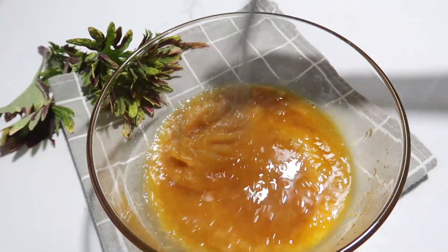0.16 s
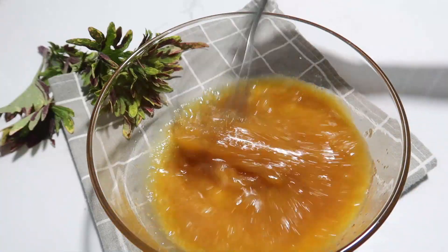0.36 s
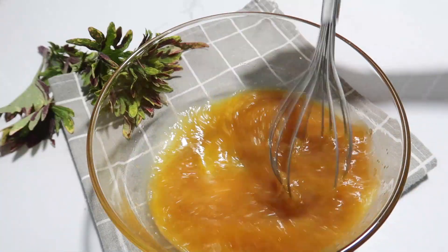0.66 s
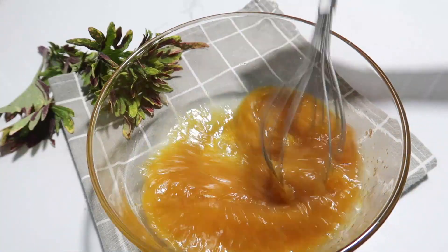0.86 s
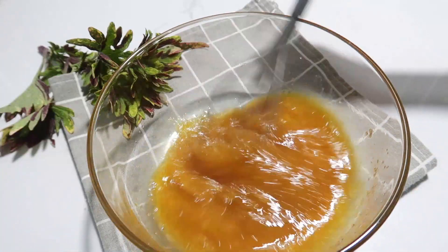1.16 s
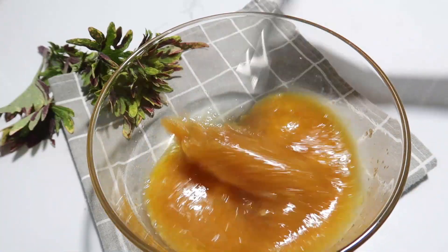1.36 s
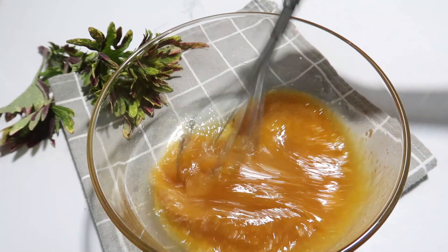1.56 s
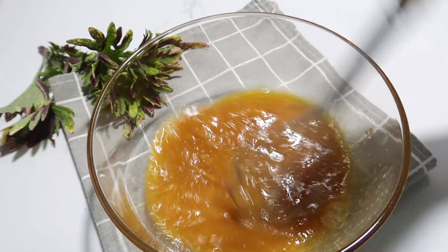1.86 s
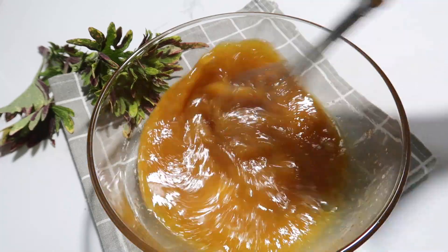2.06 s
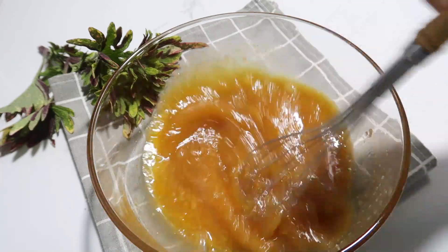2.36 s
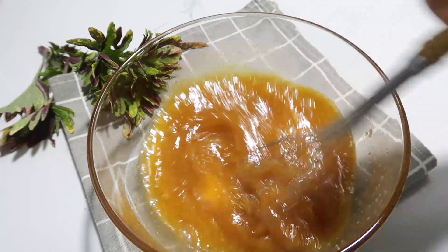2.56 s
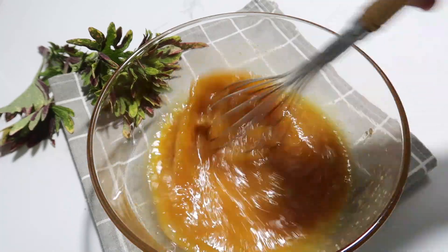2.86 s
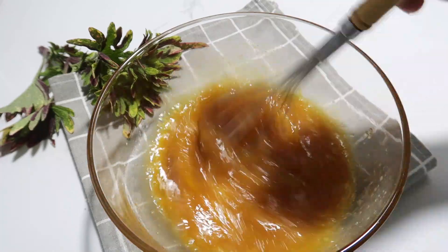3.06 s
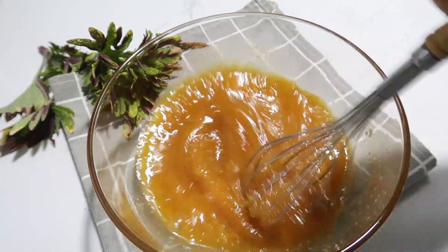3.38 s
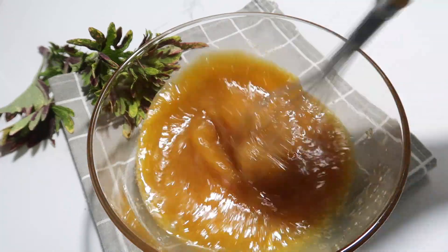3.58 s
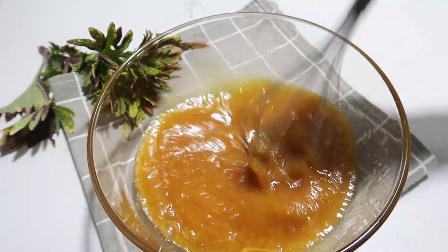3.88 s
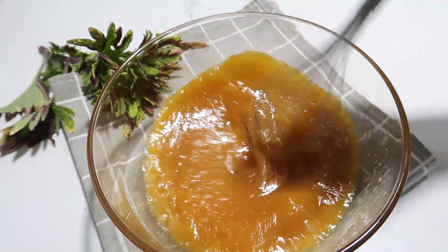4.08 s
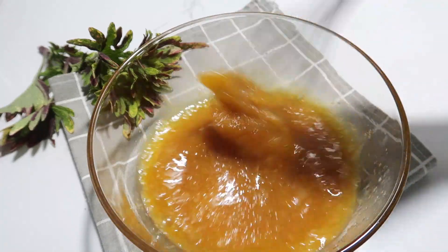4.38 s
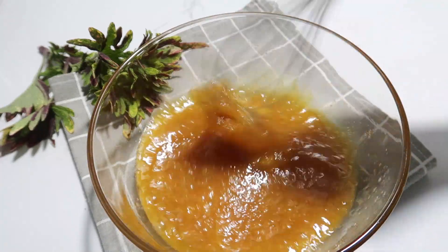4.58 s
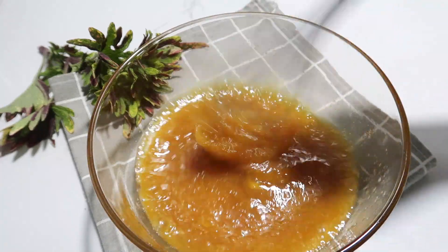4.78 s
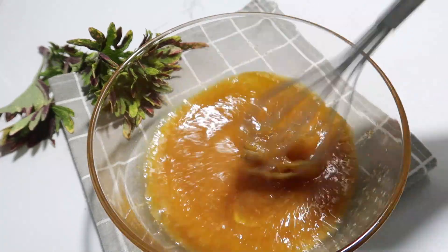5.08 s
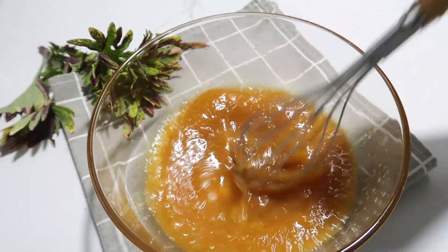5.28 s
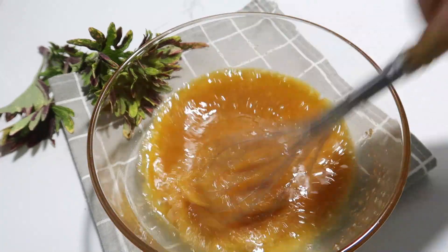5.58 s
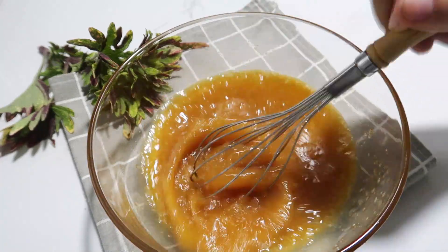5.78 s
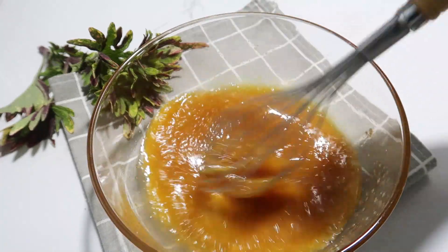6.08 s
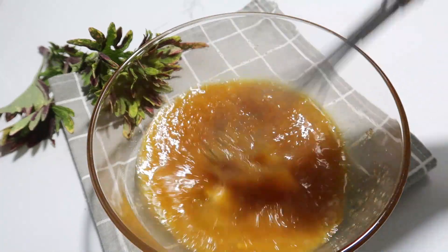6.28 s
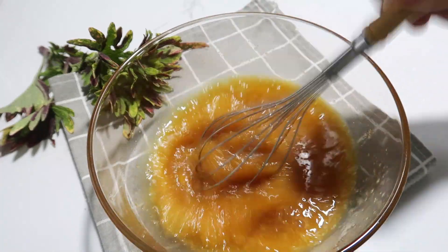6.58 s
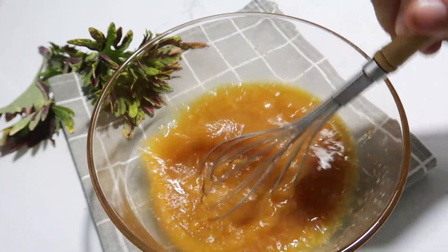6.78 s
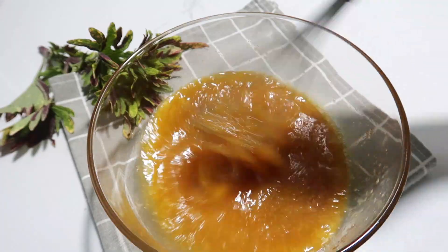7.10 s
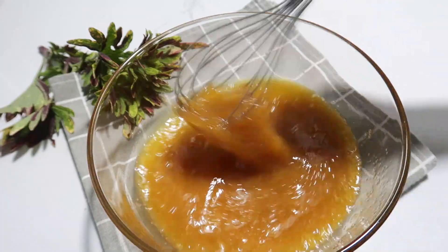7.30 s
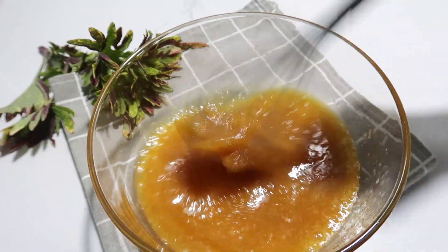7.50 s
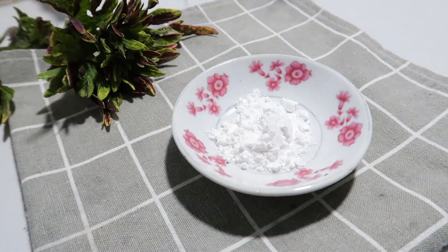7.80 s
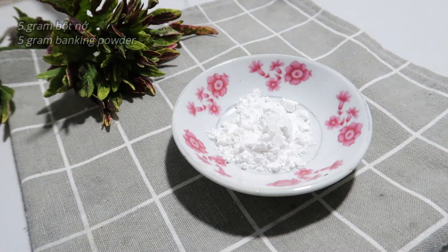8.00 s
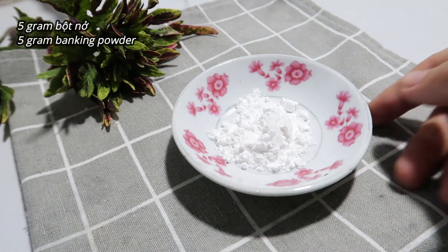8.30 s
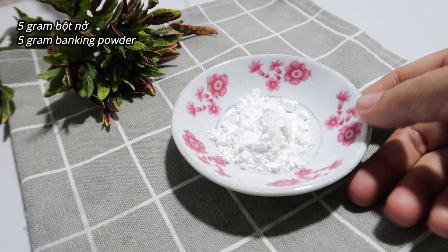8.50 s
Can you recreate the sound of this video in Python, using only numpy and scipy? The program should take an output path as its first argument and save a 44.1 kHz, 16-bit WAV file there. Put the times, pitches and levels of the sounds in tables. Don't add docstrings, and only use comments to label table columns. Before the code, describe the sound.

A wire whisk beats thick egg in a glass bowl, brisk scraping clinks about five a second, then quiet room hush.

```python
import sys
import numpy as np
from scipy import signal
from scipy.io import wavfile
from scipy.ndimage import uniform_filter1d

SR = 44100
rng = np.random.default_rng(int(sys.argv[2]) if len(sys.argv) > 2 else 0)


def int16_out(signal):
    q = np.round(np.clip(np.atleast_2d(signal).T, -1, 1) * 32767)
    wavfile.write(sys.argv[1], SR, q.astype(np.int16))


def level_to_linear(level):
    exponent = np.asarray(level, float) / 20
    return 10 ** exponent


N = 381465


def evened(x):
    return x / np.sqrt(np.mean(x ** 2) + 1e-20)


def read(points, hz):
    f, value = np.transpose(points)
    return np.interp(np.log(hz + 1), np.log(f + 1), value)


def curve(rows):
    return level_to_linear(np.interp(np.arange(N) / SR, *np.transpose(rows)))


def add(mix, s, sound):
    part = mix[round(s * SR):][:len(sound)]
    part += sound[:len(part)]


def above(x, edge_hz):
    return signal.sosfilt(signal.butter(5, edge_hz, "high", fs=SR, output="sos"), x)


def body(modes, spread_db, detune, size=1500):
    hz, width, db = np.transpose(modes)[:, :, None]
    luck_hz, luck_db = rng.standard_normal((2, len(modes), 1))
    t = np.arange(size) / SR
    decay = np.sqrt(width) * np.exp(-np.pi * width * t)
    rings = decay * np.sin(2 * np.pi * hz * (1 + detune * luck_hz) * t)
    response = (level_to_linear(db + spread_db * luck_db) * rings).sum(0)
    return response / np.linalg.norm(response)


# (time [s], thump level [dB], glass level [dB], wire fizz level [dB])
STROKES = [(.575, -21.5, -21, -24), (.603, -51, -36, -64.5), (0.716, -28, -6, -25.5),
           (0.774, -47, -25, -28.5), (.977, -22.5, -18, -17.5), (1.176, -16.5, -12, -20.5),
           (1.378, -30.5, -19.5, -25.5), (1.585, -29.5, -19.5, -17.5), (1.912, -43, -26.5, -60.5),
           (2.344, -53, -29, -33.5), (3.988, -52, -37.5, -32), (4.009, -36.5, -22, -33.5),
           (4.229, -28.5, -20.5, -22.5), (4.428, -25, -14, -21.5), (4.454, -42, -30.5, -39.5),
           (4.632, -34, -22.5, -27), (4.649, -43, -51.5, -58), (4.828, -18.5, -14.5, -17.5),
           (5, -41.5, -23.5, -43.5), (5.025, -38, -26, -30), (5.41, -36, -26, -26.5),
           (5.807, -39.5, -25, -30.5), (6.19, -51, -32, -35), (6.383, -28, -21.5, -25),
           (6.584, -36, -36.5, -36), (6.791, -33.5, -25, -33.5), (6.991, -43.5, -27, -34),
           (7.192, -34.5, -21, -24.5), (7.377, -45, -26, -38.5), (7.554, -37, -16, -24.5)]
# (time [s], low glass level [dB], thin glass level [dB], wire fizz level [dB])
LOOSE_SCUFFS = [(0.384, -32, -29.5, -34.5), (.399, -19.5, -20.5, -24.5), (0.669, -60, -50.5, -44),
                (.878, -54, -45.5, -44), (2.118, -31.5, -31.5, -42), (2.15, -43.5, -42, -47.5),
                (2.183, -37.5, -49, -44.5), (2.275, -18, -21, -39.5), (2.381, -36, -44.5, -47.5),
                (2.46, -26.5, -26, -33.5), (2.704, -25.5, -30, -43), (2.774, -42.5, -39, -46),
                (2.827, -54, -54.5, -56.5), (2.91, -36, -24.5, -36), (3.117, -50, -35.5, -33),
                (3.171, -49, -38, -37), (3.214, -38, -50, -47.5), (3.323, -30.5, -26, -36.5),
                (3.347, -49.5, -49, -68.5), (3.399, -43.5, -47.5, -45.5), (3.471, -70.5, -61, -60.5),
                (3.545, -48.5, -35.5, -36), (3.603, -43, -35, -37), (3.711, -51.5, -55, -46),
                (3.746, -65, -68.5, -56)]
STEADY_SCUFFS = [(5.2, -19, -23, -29), (5.221, -34.5, -36.5, -41), (5.39, -25.5, -36, -49),
                 (5.609, -23.5, -26, -34), (5.993, -41, -32, -38.5), (6.177, -27.5, -56, -36),
                 (6.849, -37.5, -35.5, -74)]
# (time [s], glass level [dB], wire fizz level [dB])
PLOUGHS = [(.53, -57.5, -64), (1.772, -28, -36.5), (2.256, -34.5, -44), (4.405, -52.5, -45.5),
           (5.584, -36.5, -38), (6.561, -29, -50), (6.827, -45, -46.5), (6.962, -37, -44),
           (7.626, -33.5, -54)]


def skids():
    rows = []
    for s, thump, glass, fizz in STROKES:
        rows.append((s, thump, glass, (glass + fizz) / 2, fizz, fall_ms(glass, fizz)))
    for s, low, thin, fizz in LOOSE_SCUFFS + STEADY_SCUFFS:
        rows.append((s, max(low, thin) - 32.5, low, thin, fizz, fall_ms(low, thin, fizz)))
    for s, glass, fizz in PLOUGHS:
        rows.append((s, glass - 16.5, glass, (glass + fizz) / 2, fizz, 26))
    return sorted(rows)


def fall_ms(*layers_db):
    return 6.62 - 0.3047 * (max(layers_db) + 19)


# (pitch [Hz], width [Hz], level [dB])
THIN_GLASS = [(2037, 140, 5), (2340, 250, 5), (2750, 350, 8.5), (3180, 230, 4), (3562, 170, 2),
              (4650, 130, -4)]
# (pitch [Hz], width [Hz], level [dB])
WIRES = [(4740, 390, 17.5), (5700, 1200, 20.5), (6500, 880, 15), (7530, 220, 8), (8800, 700, -16.5),
         (9810, 170, -22), (11900, 1200, -47.5), (13800, 1300, -43.5)]
# (pitch [Hz], width [Hz], level [dB])
ROCKING = [(235, 30, 0), (310, 80, -10), (480, 70, 5), (570, 70, 0)]


def skid(s, thump_db, low_db, thin_db, fizz_db, fall_ms):
    ms = np.arange(-60, 140, 1000 / SR)
    touch = np.minimum(level_to_linear(5 * (ms + 4)), 1)
    approach = np.maximum(touch, level_to_linear(-10.5 + ms / 1.195))
    stroke = np.where(ms < 0, approach, level_to_linear(-8 * ms / max(fall_ms, 3)))
    grit = rng.standard_normal(len(ms)) * level_to_linear(2.0 * np.minimum(rng.exponential(1, len(ms)), 4))
    ticks = stroke * evened(grit * (rng.random(len(ms)) < 3500 / SR))

    spread_db, detune = 3, .015
    glass = level_to_linear(low_db) * above(body(wet_glass(s), spread_db, detune), held_hz(s))
    glass = above(glass, 0.77 * held_hz(s))
    thin = body(THIN_GLASS, spread_db, detune) + 0.61 * body(jingle(1800, 4500, 40), spread_db, 0)
    wires = body(WIRES, spread_db, detune) + 0.66 * body(jingle(4500, 12000, 48), spread_db, 0)
    bowl = level_to_linear(thump_db) * above(body(ROCKING, spread_db, detune), 200)
    response = glass + level_to_linear(thin_db) * above(thin, 1900) + level_to_linear(fizz_db) * above(wires, 4600) + bowl
    return s - .06, signal.oaconvolve(ticks, response)


def jingle(low_hz, high_hz, width_hz, count=9):
    hz = low_hz * (high_hz / low_hz) ** rng.random(count)
    return [(f, width_hz, -7. * np.log2(f / low_hz)) for f in hz]


# (time [s], pitch [Hz])
HELD = [(0, 780), (.5, 600), (2, 600), (2.1, 900), (2.2, 900), (2.25, 600), (2.4, 600), (2.5, 950),
        (6.5, 950), (7.3, 720)]


def held_hz(s):
    return np.interp(s, *np.transpose(HELD))


# (pitch [Hz], width [Hz], level [dB])
WET_GLASS = [(703, 90, -26.5), (970, 16, -22.5), (1070, 150, 3.5), (1280, 130, -13), (1549, 130, 2.5)]


def wet_glass(s):
    free = np.interp(held_hz(s), [600, 950], [1, 0])
    (hz, width, db), *upper = WET_GLASS
    return [(hz, width, db + free * 29)] + upper


# (time [s], knock level [dB], knock pitch [Hz], tick level [dB])
LOOSE_KNOCKS = [(0.3786, -19, 1610, -13.5), (0.3962, -29, 920, -19), (0.5718, -16.5, 2330, -1.5),
                (0.6667, -25.5, 4500, -15.5), (.7637, -19.5, 735, -30), (0.7722, -15.5, 845, -11),
                (0.8753, -26.5, 2550, -27), (1.1737, -11, 2680, -30.5), (1.1807, -2.5, 2650, -21.5),
                (1.3773, -10, 850, 1), (1.58, -13.5, 3550, -8), (1.697, -5.5, 1800, -39),
                (1.7722, -8.5, 1093, -13), (1.816, -18, 2530, -43.5), (1.906, -2.5, 725, -38.5),
                (2.27, -3, 864, -17.5), (2.2934, -17.5, 740, -53.5), (2.4752, -7.5, 3790, -10.5),
                (2.704, -4, 2700, -13), (2.7135, -16, 2760, -9), (2.908, -17, 1900, -13),
                (3.1185, -30, 2000, -5), (3.168, -20.5, 4430, -25.5), (3.3184, -18, 1590, -25),
                (3.3343, -6.5, 1623, -13.5), (3.5407, -10.5, 4100, -5), (3.71, -39, 4500, -24),
                (3.729, -47, 4470, -39), (3.7413, -43, 4430, -22)]
STEADY_KNOCKS = [(3.9873, -30, 1405, -34), (4.003, -18, 1424, -9.5), (4.2251, -15.5, 2520, -26),
                 (4.399, -24, 1820, -59), (4.458, -16.5, 2740, -31), (4.6188, -7, 3660, -12),
                 (4.6303, -2.5, 3740, -13), (4.806, -16, 2650, -12), (5.0083, 1, 931, -8.5),
                 (5.198, -13.5, 1470, -5), (5.3889, -15, 1060, -17), (5.592, -14, 1003, -4.5),
                 (5.788, -15, 3300, -3.5), (5.9798, -10.5, 1314, -7), (6.1766, -13.5, 2750, -7),
                 (6.3691, -23, 1090, -22), (6.4212, -20.5, 2820, -21.5), (6.5695, -0.5, 1117, -9),
                 (6.7718, -16.5, 1364, -22.5), (6.7925, -14, 3720, -37), (6.852, -22, 2530, -50),
                 (6.973, -5, 1072, -10), (7.1723, -9.5, 1070, -15), (7.22, -18.5, 1490, -17),
                 (7.3597, 1, 993, -12), (7.5529, -4.5, 945, -32), (7.6244, -20, 1560, -24)]
# (pitch [Hz], level relative to the knock [dB])
AFTER_RINGS = [(730, -32.5), (955, -32.5), (1590, -25.5), (2750, -48.5), (3850, -41)]
RING_BORDERS_HZ = [905, 1160, 2100, 3100]


def knock(s, db, hz, tick_db):
    t, lead = np.arange(9000) / SR, np.arange(-800, 0) / SR
    spread_db, detune = 5, .03
    cycles = t * np.sqrt(hz * 1000)
    thud = cycles * np.exp(-cycles * 0.97) * np.sin(2 * np.pi * hz * t)
    glass = body(wet_glass(s) + THIN_GLASS, spread_db, detune)
    thud = thud / abs(thud).max()
    thud[:1500] += 2.1 * glass * np.exp(-t[:1500] / 0.012)

    landings = rng.standard_normal(200) * (rng.random(200) < .03) * np.exp(-t[:200] / .002)
    landings[20] = 2.5
    tick = above(body(WIRES + jingle(3100, 17000, 150), spread_db, detune), 3500)
    tick = np.convolve(tick * np.exp(-t[:1500] / 0.0023), landings)

    ring_hz, below_db = AFTER_RINGS[np.searchsorted(RING_BORDERS_HZ, hz)]
    beat_hz = rng.uniform([25, -70], [55, -30])[:, None]
    phase = 2 * np.pi * rng.random((2, 1))
    cluster = np.sin(2 * np.pi * ring_hz * t)
    cluster += .5 * np.sin(2 * np.pi * (ring_hz + beat_hz) * t + phase).sum(0)
    belly = np.sin(2 * np.pi * (1695 + 2 * beat_hz) * t + phase).sum(0)
    cluster += level_to_linear(-39.5 - below_db) * belly
    ring = level_to_linear(db + below_db - 60 * t / 0.26) * (1 - np.exp(-t / 0.0044)) * cluster

    sound = np.r_[0 * lead, level_to_linear(db) * thud / abs(thud).max()]
    slide_in = rng.standard_normal(len(lead)) * level_to_linear(db - 24 + 1900 * lead)
    add(sound, 0, np.convolve(slide_in, glass))
    sound = above(sound, held_hz(s))
    add(sound, -lead[0], ring)
    add(sound, -lead[0], level_to_linear(tick_db) * tick / abs(tick).max())
    return s + lead[0] - .001, sound


# (time [s], lowest mode level [dB], second mode level [dB], upper modes level [dB], free ring [s])
RIM_BLOWS = [(.885, -38, -61.5, -66, .078), (.974, -16, -36.5, -26.5, 0.099),
             (1.12, -21.5, -40, -54, 0.063), (1.173, -30, -29.5, -26.5, .11),
             (1.377, -35, -28.5, -37.5, 0.11), (1.578, -19, -41.5, -26.5, .21),
             (1.62, -24.5, -25.5, -39, .1), (1.9, -22.5, -50, -54, 0.0208)]
# (level [dB], t60 [s])
RIM_MODES = [(-7, 0.42), (-3, 0.96), (0.5, 0.41), (-13, 0.29), (-5, 0.23), (-0.5, 0.1), (-14, .3),
             (-14, 0.33), (-16.5, 0.22), (-20, 0.11), (-35, .4), (-19.5, 0.17)]
RIM_HZ = [706, 1578, 2610, 3815, 5196, 5232, 5360, 6858, 8688, 9828, 10740, 12935]


def rim(s, low_db, second_db, upper_db, free_s):
    t = np.arange(SR // 3) / SR
    hz, (db, t60) = np.c_[RIM_HZ], np.transpose(RIM_MODES)[:, :, None]
    blow_db = np.array([low_db, second_db] + [upper_db] * (len(RIM_MODES) - 2))[:, None]
    luck_db = 4 * rng.standard_normal(hz.shape) * (hz > 3000)
    modes = level_to_linear(db + blow_db + luck_db - 60 * t / t60) * np.sin(2 * np.pi * hz * t)
    rattle = level_to_linear(evened(uniform_filter1d(rng.standard_normal(len(t)), 900)))
    swell = 1 - np.exp(-t / (.003 if upper_db > -40 else .02))
    smother = level_to_linear(-300 * np.maximum(t - free_s, 0))
    return s, np.sqrt(2) * modes.sum(0) * smother * rattle * swell


# (time [s], pitch [Hz], level [dB], t60 [s])
LOOSE_PINGS = [(0.373, 916, -26, 0.07), (0.39, 2433, -23, 0.09), (0.395, 2660, -25, 0.07),
               (0.397, 934, -19, 0.09), (0.521, 1614, -45.5, 0.1), (0.523, 3445, -42, 0.08),
               (0.567, 840, -20.5, 0.13), (0.571, 3488, -20, 0.06), (0.593, 920, -25.5, 0.1),
               (0.662, 5800, -30, 0.06), (0.779, 1650, -31.5, 0.22), (0.794, 685, -35, 0.2),
               (0.87, 4600, -42.5, 0.07), (0.972, 714.6, -18, 0.31), (1.107, 661, -24, 0.09),
               (1.159, 2720, -12.5, 0.05), (1.174, 1593, -20.5, 0.21), (1.189, 710, -28.5, 0.2),
               (1.221, 2605, -29, 0.24), (1.347, 725, -23.5, 0.04), (1.442, 1578, -27, 0.53),
               (1.577, 1504, -18.5, 0.09), (1.582, 5361, -21, 0.07), (1.625, 1571, -21.5, 0.16),
               (1.705, 2590, -36, 0.37), (1.734, 695, -25.5, 0.08), (1.786, 4306, -34, 0.09),
               (1.918, 709, -21, 0.18), (2.109, 2540, -27, 0.08), (2.113, 2070, -28, 0.07),
               (2.141, 2850, -30, 0.06), (2.179, 947, -34, 0.1), (2.221, 947, -46, 0.09),
               (2.271, 823, -10.5, 0.1), (2.311, 820, -26.5, 0.16), (2.313, 912, -23, 0.19),
               (2.335, 2920, -31, 0.12), (2.335, 3080, -21, 0.06), (2.367, 689, -38, 0.25),
               (2.375, 5300, -37.5, 0.09), (2.377, 3730, -34, 0.06), (2.45, 1050, -24.5, 0.07),
               (2.698, 1070, -20, 0.07), (2.732, 987, -42, 0.2), (2.762, 2863, -30, 0.09),
               (2.909, 2600, -39, 0.16), (2.967, 1776, -44, 0.18), (3.163, 1820, -31.5, 0.1)]
LATER_PINGS = [(3.195, 968, -32, 0.08), (3.241, 990, -47, 0.17), (3.33, 1098, -26, 0.071),
               (3.594, 1571, -35, 0.069), (3.596, 2583, -32, 0.08), (3.598, 4069, -30, 0.08),
               (3.724, 4478, -43, 0.12), (4.027, 947, -37.5, 0.11), (4.22, 559, -25, 0.088),
               (4.222, 1055, -21, 0.12), (4.222, 1894, -24.5, 0.14), (4.418, 3682, -15, 0.13),
               (4.452, 1614, -30, 0.094), (4.623, 3703, -12, 0.07), (4.817, 1464, -16.5, 0.12),
               (4.821, 3337, -23, 0.1), (4.839, 1658, -17, 0.07), (4.841, 689, -33.5, 0.24),
               (5.005, 3703, -25, 0.055), (5.098, 947, -38, 0.16), (5.19, 2906, -27.5, 0.12),
               (5.192, 2842, -19, 0.06), (5.402, 4586, -24, 0.069), (5.404, 4909, -24, 0.06),
               (5.593, 1076, -29, 0.13), (5.801, 925, -22, 0.09), (5.803, 473, -26, 0.07),
               (5.803, 1765, -29, 0.11), (5.97, 1744, -24, 0.11), (6.17, 968, -29, 0.14),
               (6.172, 1550, -26.5, 0.11), (6.376, 2067, -20, 0.089), (6.38, 4931, -22, 0.077),
               (6.783, 3036, -28.5, 0.13), (6.819, 3100, -43, 0.12), (6.821, 4285, -39, 0.06),
               (6.844, 1335, -32, 0.079), (6.968, 1614, -14.5, 0.05), (6.984, 2885, -30, 0.071),
               (7.0, 1614, -39, 0.3), (7.186, 1679, -18, 0.06), (7.186, 3036, -27, 0.058),
               (7.186, 4543, -17, 0.093), (7.236, 1593, -36, 0.11), (7.567, 947, -25, 0.22),
               (7.567, 1916, -33, 0.27), (7.619, 1528, -27, 0.072), (7.669, 1744, -29, 0.08)]


def ping(s, hz, db, t60):
    t = np.arange(SR // 4) / SR
    waver = evened(uniform_filter1d(rng.standard_normal(len(t)), 400))
    fade_db = db - 2.5 - 60 * t / max(t60, .02) + 2.0 * waver
    return s, level_to_linear(fade_db) * np.sin(2 * np.pi * hz * t) * (1 - np.exp(-t / 0.0016)) ** 2


# (time [s], pitch [Hz], level [dB], t60 [s], free ring [s])
LINGERS = [(0, 198, -46, 0.39, 0.046), (0.57, 4700, -40, 0.2, 0.018), (1.06, 580, -25, 0.18, .025),
           (1.91, 722, -20, 0.27, 0.05), (3.385, 4070, -19, 0.026, .06), (5, 9800, -60, 0.84, 0.18),
           (4.5, 3720, -21, 0.27, 0.022), (8, 1764, -39.5, 0.59, 0.069), (4.5, 3780, -42, .4, .15),
           (3.5, 1800, -46, .6, .2), (5, 1500, -48, .8, .14), (2, 4000, -46.5, .4, .09),
           (8, 1800, -56, .5, .1), (6.5, 2100, -42.5, 0.295, .1), (2.2, 5230, -45, 0.44, .1)]


def linger(s, hz, db, t60, free_s):
    t = np.arange(SR // 3) / SR
    fade_db = -60 * t / t60 - 600 * np.maximum(t - free_s, 0)
    return s, level_to_linear(db + fade_db) * np.sin(2 * np.pi * hz * t) * (1 - np.exp(-t / 0.01))


# (time [s], level [dB], centre [Hz])
FROTH = [(5.55, -81, 6630), (5.63, -42.5, 6500), (5.759, -56.5, 6840), (5.83, -43, 10900),
         (5.959, -58.5, 11070), (6.02, -49, 9300), (6.17, -80, 9120)]


def froth():
    hz, t, z = signal.stft(rng.standard_normal(N), SR, nperseg=256)
    s, db, centre_hz = np.transpose(FROTH)
    octaves = np.log2((hz[:, None] + 1) / np.interp(t, s, centre_hz))
    hump = level_to_linear(np.interp(t, s, db, -150, -150) - 28 * octaves ** 2)
    return signal.istft(z * hump, SR, nperseg=256)[1][:N]


# (time [s], level [dB], pitch [Hz])
BUMPS = [
    (1.175, -42, 85),
    (6.55, -38.5, 60),
]


def bump(s, db, hz):
    t = np.arange(-.04, .04, 1 / SR)
    return s - .04, level_to_linear(db - 4 * (t * hz) ** 2) * np.sin(2 * np.pi * hz * t)


# (time [s], level [dB])
RUMBLE = [
    (6.57, -84),
    (6.63, -41),
    (6.72, -55),
    (6.79, -50.5),
]
# (pitch [Hz], width [Hz], level [dB])
DRAG = [(150.7, 37, -3.5), (285, 84, -11.5), (508.4, 71, -3), (700, 360, -23.5), (2148, 110, -10)]


def rumble():
    throb = 1 + .5 * np.sin(2 * np.pi * 75 * np.arange(N) / SR)
    drone = signal.oaconvolve(throb * rng.standard_normal(N), body(DRAG, 1, 0))[:N]
    return curve([(6.5, -140)] + RUMBLE + [(6.9, -140)]) * evened(above(drone, 125))


# (frequency [Hz], t60 [s])
KITCHEN = [(200, .2), (600, .28), (4000, .24), (9000, .19), (15000, .14)]


def kitchen(x):
    hz, t, z = signal.stft(rng.standard_normal((3, SR // 2)), SR, nperseg=256)
    tails = signal.istft(z * level_to_linear(-60 * t / read(KITCHEN, hz)[:, None]), SR, nperseg=256)[1]
    tails = tails * (1 - np.exp(-np.arange(tails.shape[1]) / SR / 0.0016))
    cycle = 1.3 * np.arange(N) / SR + np.arange(3)[:, None] / 3
    turn = np.cos(2 * np.pi * cycle) * np.sqrt(2 / 3)
    return signal.fftconvolve(x * turn, tails / np.linalg.norm(tails[0]), axes=1)[:, :N].sum(0)


# (time [s], length [s], pitch [Hz], level [dB])
BIRD = [
    (7.76, .2, 2000, -74),
    (7.82, .22, 4200, -73),
    (8.54, .1, 3000, -71),
]


def bird(s, length, hz, db):
    t = np.arange(0, length, 1 / SR)
    waver, flutter = (evened(uniform_filter1d(rng.standard_normal(len(t)), 200)) for _ in range(2))
    whistle = np.sin(2 * np.pi * np.cumsum(hz + 45 * waver) / SR)
    return s, level_to_linear(db + 5.6 * flutter) * np.sqrt(2) * whistle * signal.windows.tukey(len(t), .3)


# (frequency [Hz], level per Hz [dB])
HUSH = [(18, -47), (36, -14.5), (55, 3.5), (90, -12), (200, -17.5), (700, -28.5), (1000, -25), (2500, -32),
        (6000, -46), (16000, -67)]
# (time [s], level [dB])
HUSH_LEVEL = [(0, -43.5), (.1, -66.5), (.3, -64), (2, -67), (4, -63), (6, -69), (7.7, -63), (8.65, -60)]


def hush():
    frames, hz = N // 512 + 5, np.fft.rfftfreq(2048, 1 / SR)
    a, b, patches = rng.standard_normal((frames, 1025, 3)).T
    patches = evened(uniform_filter1d(uniform_filter1d(patches, 14, 0), 10, 1))
    z = (a + 1j * b) * level_to_linear(read(HUSH, hz)[:, None] + 1.8 * patches)
    return curve(HUSH_LEVEL) * evened(signal.istft(z, nperseg=2048, noverlap=1536)[1][:N])


def scene():
    bowl, direct = np.zeros(N), np.zeros(N)
    for source, table in ((skid, skids()), (knock, LOOSE_KNOCKS + STEADY_KNOCKS), (rim, RIM_BLOWS)):
        for row in table:
            add(bowl, *source(*row))
    close = ((ping, LOOSE_PINGS + LATER_PINGS), (linger, LINGERS), (bump, BUMPS), (bird, BIRD))
    for source, table in close:
        for row in table:
            add(direct, *source(*row))
    room = level_to_linear(-16.0) * kitchen(bowl)
    around = froth() + rumble() + hush()
    return (bowl + room + direct + around)[None]


def top_cut(x):
    return signal.sosfilt(signal.butter(12, 16810, fs=SR, output="sos"), x)


def record(dry):
    power_db = 10 * np.log10(uniform_filter1d(dry ** 2, 200, axis=1).clip(1e-12))
    recovery_db = np.arange(N) * 40 / SR
    held_db = np.maximum.accumulate(power_db + recovery_db, axis=1) - recovery_db
    over_db = np.maximum(held_db + 18.0, 0)
    dip_db = 0.089 * uniform_filter1d(over_db, 300, axis=1, origin=149)
    limited = 0.96 * np.tanh(dry / level_to_linear(dip_db) / 0.98)
    edge = signal.firwin(41, 14800, fs=SR)[None]
    return top_cut(signal.oaconvolve(limited, edge, "same"))


dry = scene()
out = record(dry)
int16_out(out)
```